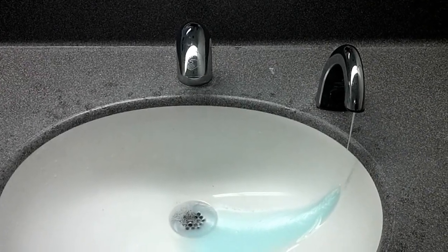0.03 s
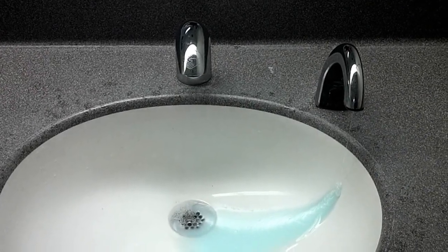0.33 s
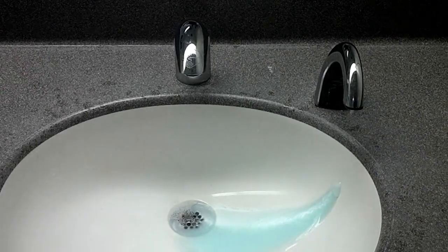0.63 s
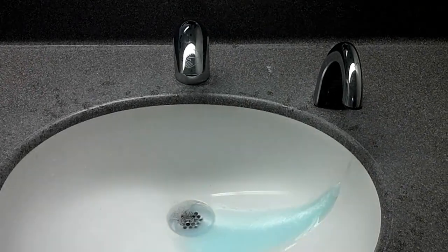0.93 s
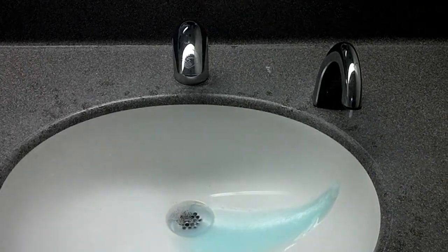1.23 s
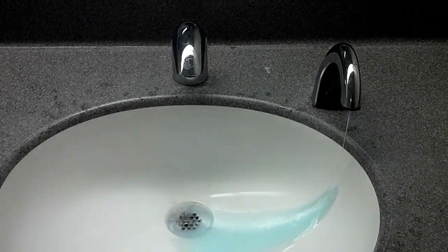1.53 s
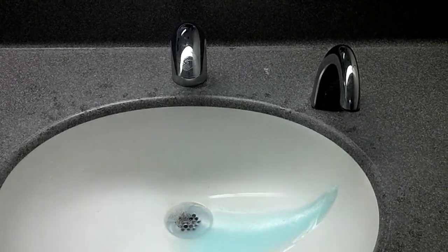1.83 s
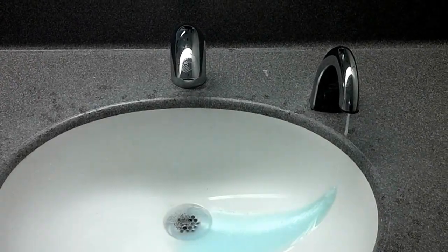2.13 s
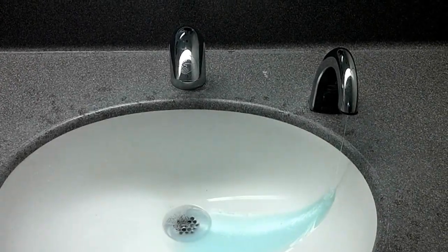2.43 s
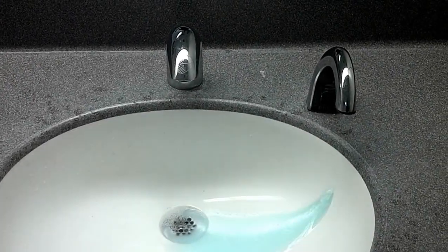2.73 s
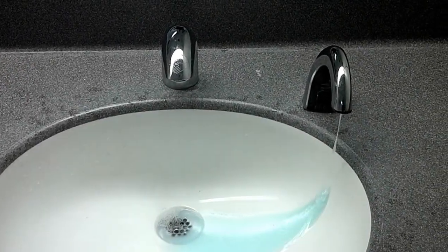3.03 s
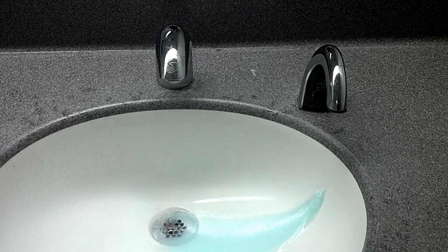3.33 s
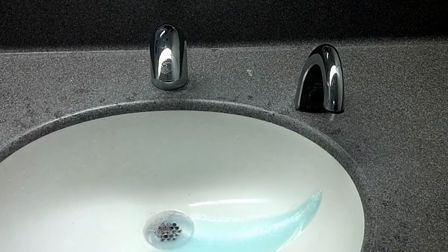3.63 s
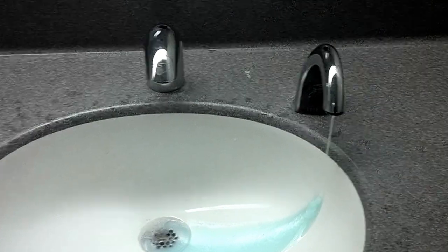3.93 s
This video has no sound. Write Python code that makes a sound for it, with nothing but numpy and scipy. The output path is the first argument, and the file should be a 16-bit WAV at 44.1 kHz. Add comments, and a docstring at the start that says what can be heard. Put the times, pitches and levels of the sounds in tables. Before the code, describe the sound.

An automatic soap dispenser whirs five times, at about 0.4, 0.9, 1.6, 2.5 and 3.2 seconds. Each short, raspy motor burst is followed by a brief reverse whir and a soft gulp, with a slight bathroom echo. Three tiny bubbles pop at around 0.9, 1.2 and 1.5 seconds. Ventilation drones and hisses steadily underneath, and the whole sound fades in over the first second.

```python
"""Ventilation drones and hisses in a bathroom, and an automatic soap dispenser whirs five times over it.
For each dose its small geared pump spins up with a rasp and stops, then runs briefly backwards,
drawing the soap back with a soft gulp. Three tiny bubbles burst between the early doses.
The whole sound fades in, and stereo widening feeds each side, late and upside down, into the other."""
import sys
import numpy as np
from scipy import signal
from scipy.fft import rfft, irfft
from scipy.io import wavfile
from scipy.ndimage import uniform_filter1d

SR = 44100
rng = np.random.default_rng(int(sys.argv[2]) if len(sys.argv) > 2 else 0)


def digitize_waveform(pressure):
    """Quantize a signal to 16-bit integers and store it at the path in sys.argv[1].

    Rows of a 2-D input are taken as channels; values are limited to [-1, 1].
    """
    field = np.atleast_2d(pressure).T
    bounded = np.clip(field, -1, 1)
    quanta = np.round(bounded * 32767).astype(np.int16)
    wavfile.write(sys.argv[1], SR, quanta)


N = 176400
TIME, HZ = np.arange(N) / SR, np.fft.rfftfreq(N, 1 / SR)


def amp(db):
    """Turns decibels into a number to multiply by."""
    return 10 ** (np.asarray(db) / 20)


def unit(x):
    """Scales to an average size (rms) of 1."""
    return x / np.sqrt(np.mean(x ** 2) + 1e-20)


def curve(points):
    """Joins a table's points into a value for every frequency, on a log scale."""
    hz, value = np.transpose(points)
    return np.interp(np.log(HZ + 1), np.log(hz + 1), value)


def peaks(notes, width_hz):
    """A narrow boost, in dB, around each ringing note."""
    return sum(db / (1 + (2 * (HZ - hz) / width_hz) ** 2) for hz, db in notes)


def band(hz, width_hz, steepness=2):
    """Gains that let through the frequencies near hz."""
    return 1 / (1 + (2 * (HZ - hz) / width_hz) ** steepness)


def colour(x, gain):
    """Turns each frequency up or down by its gain."""
    return irfft(rfft(x) * gain, N)


def drift(rate_hz):
    """A smooth random wobble; a higher rate wobbles faster."""
    return unit(colour(rng.standard_normal(N), np.exp(-(HZ / rate_hz) ** 2)))


# The air's low drone and even hiss: (frequency [Hz], relative level [dB])
DRONE = [(25, -31.5), (50, -38), (65, -21), (80, -29.5), (100, -14.5), (120, -4.5), (165, -16), (195, -8),
         (225, -2), (290, -12.5), (350, -9.5), (500, -11.5), (600, -21.5), (800, -20)]
HISS = [(1300, -28), (2200, -32), (2800, -32.5), (3600, -34.6), (5200, -38.5), (8500, -36), (15000, -36.4)]
# Notes at which the room rings: (frequency [Hz], boost [dB])
ROOM_NOTES = [(108, 2), (195, 10), (222, 7), (260, 7.5), (333, 6), (362, 4), (402, 3.5), (428, 4.5),
              (478, 8.5), (505, 0), (525, 6.5)]
# How alike the air sounds on both sides: (frequency [Hz], likeness [0-1])
LIKENESS = [(60, 0), (150, .55), (230, .7), (420, .75), (560, .6), (720, .45), (1100, 0), (2000, 0)]
# How far the drone's waves are ahead on the left: (frequency [Hz], lead [rad])
LEFT_LEAD = [(120, 0.67), (220, 0.72), (330, 0.48), (500, 0.47), (700, 0.047)]
# How much louder the drone is on the left: (frequency [Hz], left minus right [dB])
BALANCE = [(40, 21), (80, -14.5), (125, -1.5), (500, -1.2), (1200, 1)]


def ventilation():
    """Rushing air makes the room ring, over a wavering electrical hum."""
    # Small patches of pitch and time get slightly louder or softer.
    grid = signal.stft(rng.standard_normal((2, N)), nperseg=1024, noverlap=768)[2]
    patches = uniform_filter1d(rng.standard_normal(grid.shape[1:]), size=10, axis=0)
    patches = unit(uniform_filter1d(patches, size=12, axis=1))
    noise = signal.istft(grid * amp(.9 * patches), nperseg=1024, noverlap=768)[1][:, :N]
    left, unrelated = rfft(noise)
    alike = curve(LIKENESS)
    right = alike * left + np.sqrt(1 - alike ** 2) * unrelated
    right = right * np.exp(-1j * curve(LEFT_LEAD)) / amp(curve(BALANCE))
    tone = amp(curve(DRONE + HISS) + peaks(ROOM_NOTES, width_hz=7.5))
    air = unit(irfft(np.array([left, right]) * tone, N)) * amp(-42 + .3 * drift(26))
    hum_hz, lag_rad = 119.4, np.array([[0], [.61]])
    hum = np.sin(2 * np.pi * hum_hz * TIME - lag_rad + .56 * drift(1.9))
    hum *= 1 + .13 * drift(31)
    return air + amp(-52) * unit(hum)


def room_echo(sound, fade_s=.18):
    """Short echoes bounce off the basin and wall, different on each side."""
    t = TIME[:SR // 2]
    tail = rng.standard_normal((2, len(t))) * amp(-60 * t / fade_s) * (t > .004)
    return signal.fftconvolve(sound, tail / np.linalg.norm(tail[0]), axes=1)[:, :N]


# Bursting bubbles: (time [s], level [dB], centre frequency [Hz], width [Hz])
BUBBLES = [(.8535, -45, 9000, 1800), (1.1625, -43, 9000, 1800), (1.549, -35.5, 10000, 19000)]


def bubbles(fade_s=.0006):
    """Tiny soap bubbles burst: two thin ticks and one bright snap."""
    out = np.zeros((2, N))
    for start, db, hz, width_hz in BUBBLES:
        burst = rng.standard_normal((2, N)) * (TIME > start) * np.exp(-abs(TIME - start) / fade_s)
        out += amp(db) * colour(burst, unit(band(hz, width_hz, steepness=4)))
    return out


def gulps(push_stops, delay_s=.172, swell_s=.056):
    """Soap pulled back into the spout makes a hollow note and a short buzz of the casing."""
    swell = sum(np.exp(-((TIME - stop - delay_s) / swell_s) ** 2) for stop in push_stops)
    note = unit(colour(rng.standard_normal(N), band(hz=500, width_hz=340)))
    buzz = unit(colour(rng.standard_normal(N), band(hz=1123, width_hz=150)))
    return amp(-54.5) * swell * note + amp(-55.5) * swell ** 4 * buzz


def spin(start, stop, rise_s, coast_s):
    """Climbs from 0 towards 1 while the motor has power, then coasts back down."""
    rise = 1 - np.exp(-np.clip(TIME - start, 0, stop - start) / rise_s)
    return rise * np.exp(-np.maximum(TIME - stop, 0) / coast_s)


def gears(runs, tone, notes, teeth_hz, motor_s, treble_s):
    """Clicking, rubbing teeth make the casing ring; motor_s and treble_s are (rise, fall) times."""
    speed = sum(spin(start, stop, *motor_s) for start, stop, _ in runs)
    teeth_passed = np.cumsum(teeth_hz * np.sqrt(speed) * (1 + .12 * drift(150))) / SR
    # One click per tooth, each with a random strength and sign.
    clicks = np.diff(np.floor(teeth_passed), prepend=0) * np.sqrt(SR / teeth_hz)
    clicks = clicks * amp(2.5 * rng.standard_normal((2, N))) * rng.choice([-1, 1], (2, N))
    rubbing = rng.standard_normal((2, N)) * (1 + .054 * np.cos(2 * np.pi * teeth_passed))
    bass_cut = HZ ** 2 / (HZ ** 2 + 400 ** 2)
    casing = amp(curve(tone) + peaks(notes, width_hz=20)) * bass_cut
    whir = colour(.3 * clicks + .8 * rubbing, unit(casing))
    body = colour(whir, 1 / (1 + (HZ / 1750) ** 6))
    treble = amp(5.3) * (whir - body)
    return sum(amp(db) * (body * spin(start, stop, *motor_s) + treble * spin(start, stop, *treble_s))
               for start, stop, db in runs)


# The pump's tone, pushing and drawing back: (frequency [Hz], relative level [dB])
PUSH_TONE = [(600, -10), (950, -6), (1130, .5), (1550, -6.5), (1800, -4.8), (2350, -1.5), (2680, -.5),
             (2870, -11), (3120, -14.5), (3400, -9), (3950, -14), (4250, -13), (4800, -14), (5100, -17),
             (5550, -22.5), (6200, -17.8), (7000, -18), (7900, -21), (8800, -31), (15000, -50)]
BACK_TONE = [(600, -2), (850, -7), (1130, 1), (1600, -3), (1900, -4.5), (2100, -10.5), (2450, -8.5),
             (2750, -9), (3200, -15.5), (3650, -13.2), (3950, -19), (4300, -16), (5500, -26), (5950, -23),
             (6400, -17), (7000, -17), (8800, -34), (15000, -55)]
# Notes at which the casing rings in each direction: (frequency [Hz], boost [dB])
PUSH_NOTES = [(1085, 6), (1163, 7.5), (1340, 11), (1384, 6), (1642, 5), (1777, 7), (1976, 6), (2126, 9),
              (2325, 8), (3343, 6), (3628, 10), (3817, 11), (4527, 7), (4764, 8), (6212, 7), (6740, 9)]
BACK_NOTES = [(1082, 8), (1159, 7), (1228, 4), (1389, 10), (1470, 6), (1523, 9), (1588, 7), (2990, 6),
              (3330, 6), (3741, 6), (4188, 11), (4527, 6), (6342, 8), (6428, 11), (6810, 7)]
# Soap doses: (push start [s], push stop [s], relative push level [dB], relative draw-back level [dB])
DOSES = [(0.364, 0.549, -0.3, -2.5), (.912, 1.123, -1, -3), (1.626, 1.942, -1.2, -1.3),
         (2.513, 2.752, -2, -3.5), (3.244, 3.565, -1.5, -2.3)]


def pump(push_db=-42.5, back_db=-43.5, pause_s=.036, back_s=.141):
    """For each dose the pump pushes soap out, pauses, then runs backwards."""
    pushes = [(start, stop, push_db + db) for start, stop, db, _ in DOSES]
    backs = [(stop + pause_s, stop + pause_s + back_s, back_db + db) for _, stop, _, db in DOSES]
    # A push gets brighter as pressure builds, and its treble stops crisply.
    push = gears(pushes, PUSH_TONE, PUSH_NOTES, teeth_hz=410, motor_s=(.075, .028), treble_s=(.2, .024))
    # After a draw-back the treble lingers.
    back = gears(backs, BACK_TONE, BACK_NOTES, teeth_hz=225, motor_s=(.09, .042), treble_s=(.09, .052))
    return push + back


def scene():
    """The dispenser and its echo, with bubbles and ventilation."""
    dispenser = pump() + gulps([stop for _, stop, _, _ in DOSES])
    return dispenser + amp(-5.5) * room_echo(dispenser) + bubbles() + ventilation()


# How much of each side is fed into the other: (frequency [Hz], share [0-1])
CROSS_FEED = [(680, 0.026), (900, 0.98), (1150, 0.72), (2600, 1), (15000, .99)]
# The opening rise in loudness: (time [s], level [dB])
FADE_IN = [(0, -10), (.3, -8), (.6, -6.5), (.9, -3), (1.15, -1), (4, 0)]


def record(dry, delay_s=.000385, top_hz=15700):
    """Widens the stereo, fades in and removes the very highest treble."""
    share, sides = curve(CROSS_FEED), rfft(dry)
    swapped_late = sides[::-1] * np.exp(-2j * np.pi * HZ * delay_s)
    wide = irfft((sides - share * swapped_late) / np.sqrt(1 + share ** 2), N)
    faded = wide * amp(np.interp(TIME, *np.transpose(FADE_IN)))
    treble_cut = signal.firwin(511, top_hz, window=("kaiser", 9), fs=SR)
    return signal.oaconvolve(faded, treble_cut[None], "same")


dry = scene()
out = record(dry)
digitize_waveform(out)
```